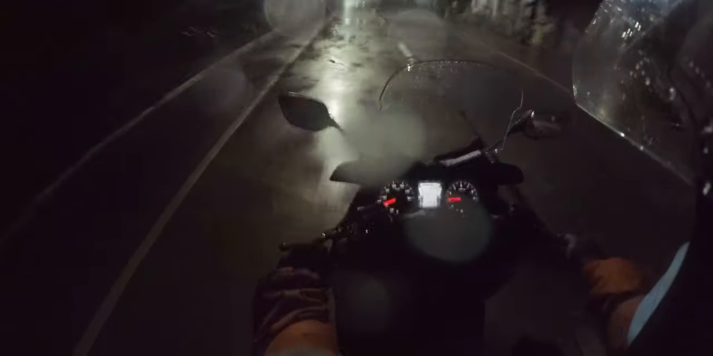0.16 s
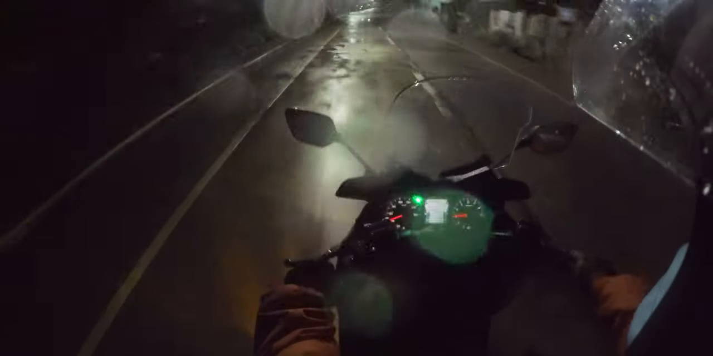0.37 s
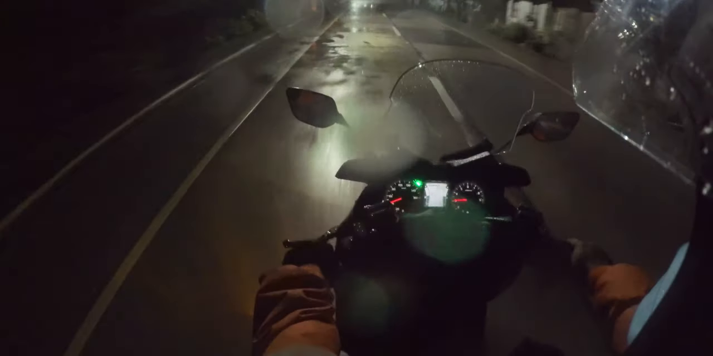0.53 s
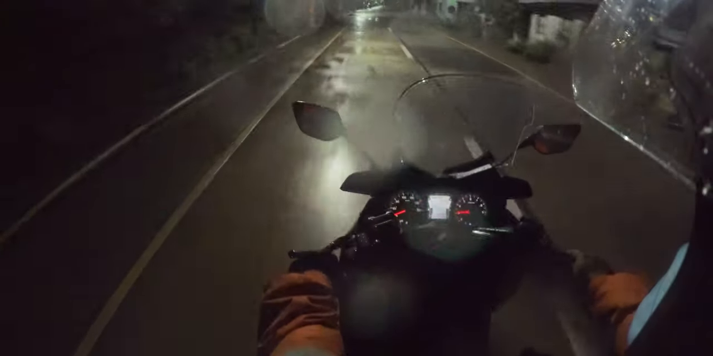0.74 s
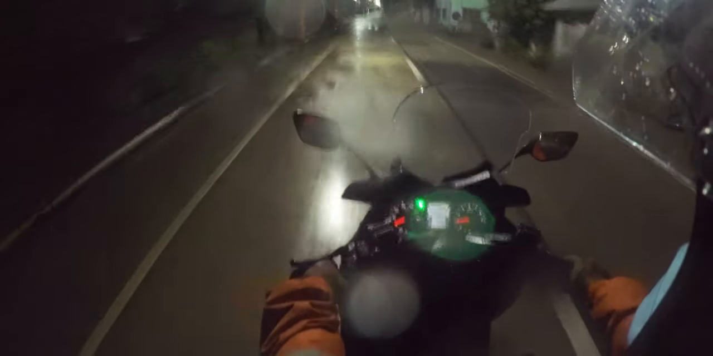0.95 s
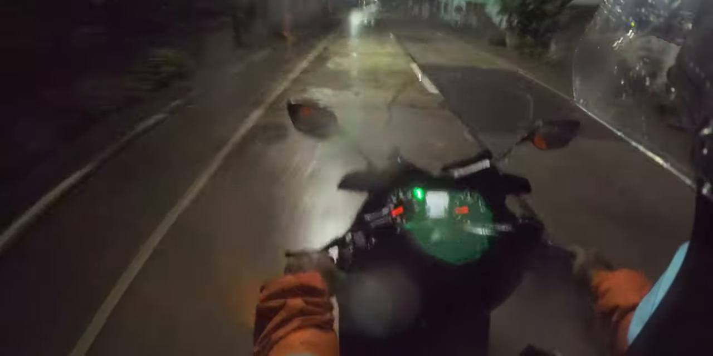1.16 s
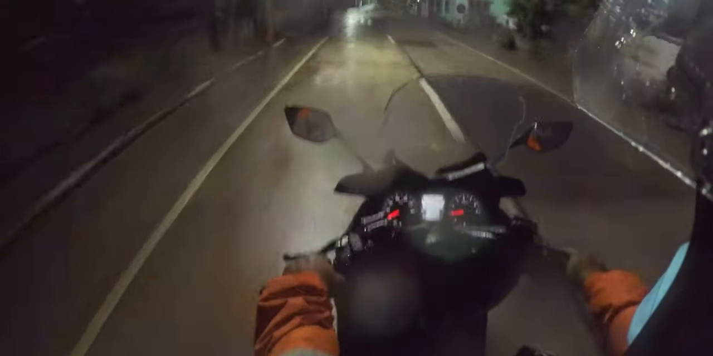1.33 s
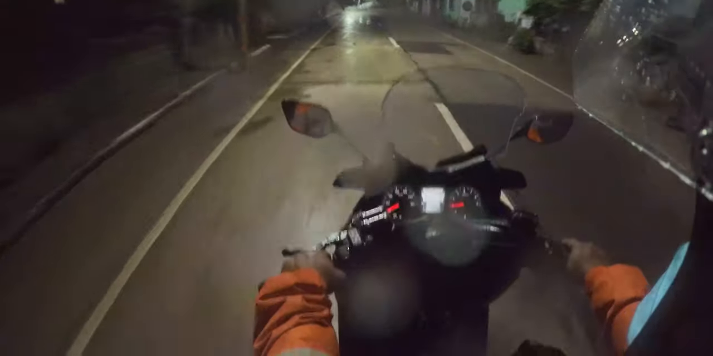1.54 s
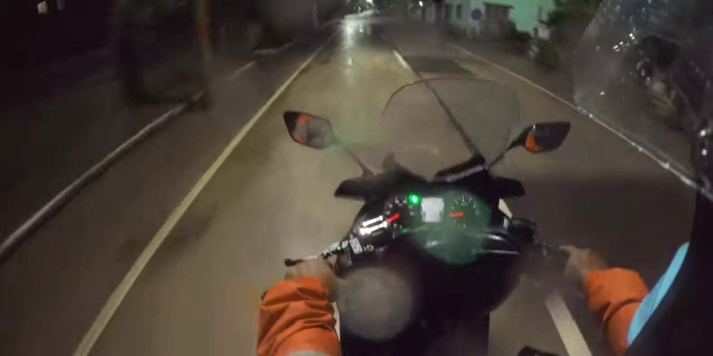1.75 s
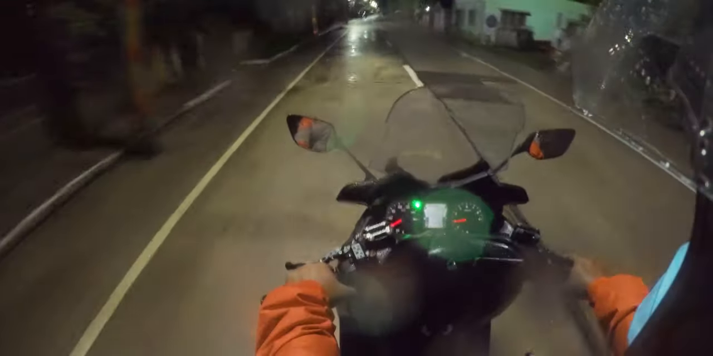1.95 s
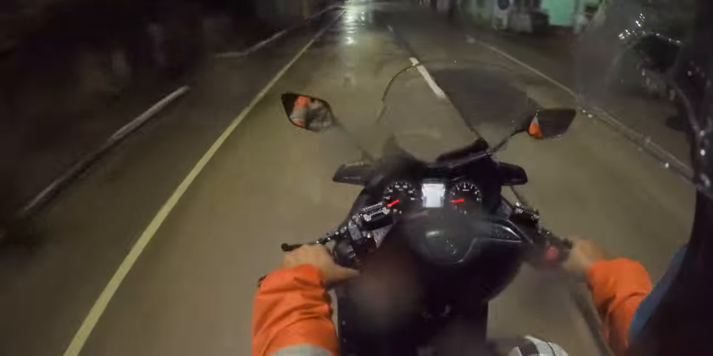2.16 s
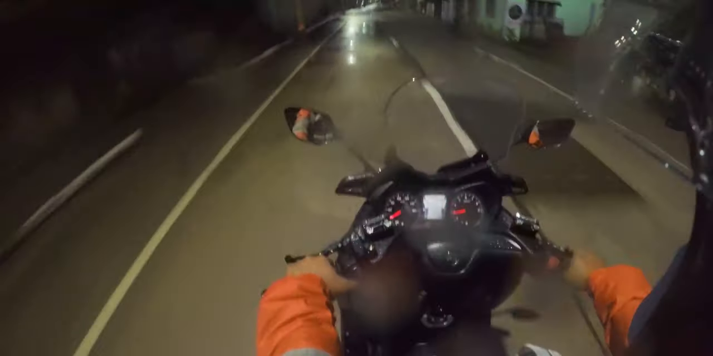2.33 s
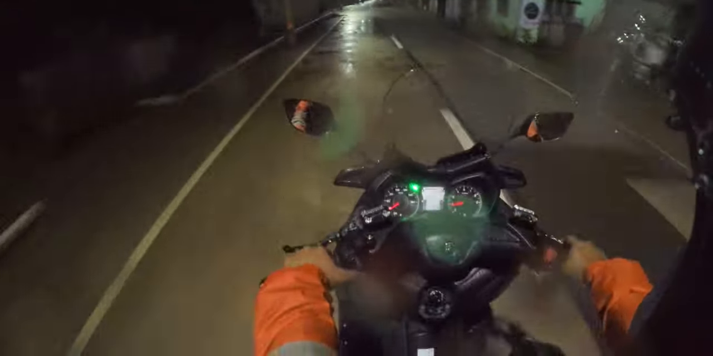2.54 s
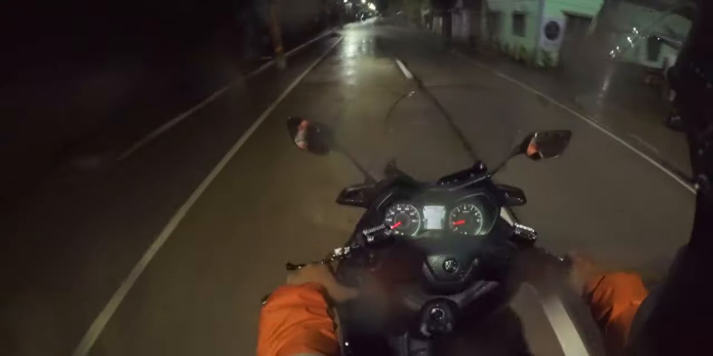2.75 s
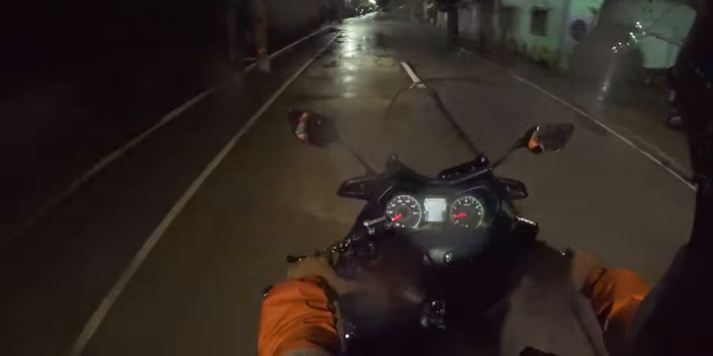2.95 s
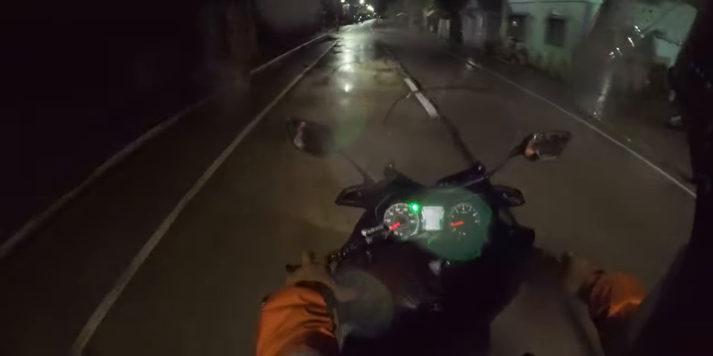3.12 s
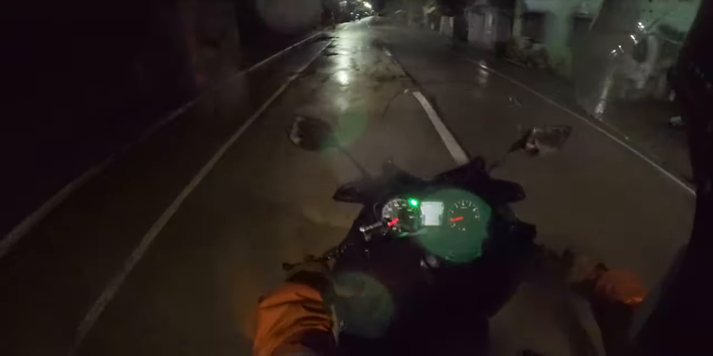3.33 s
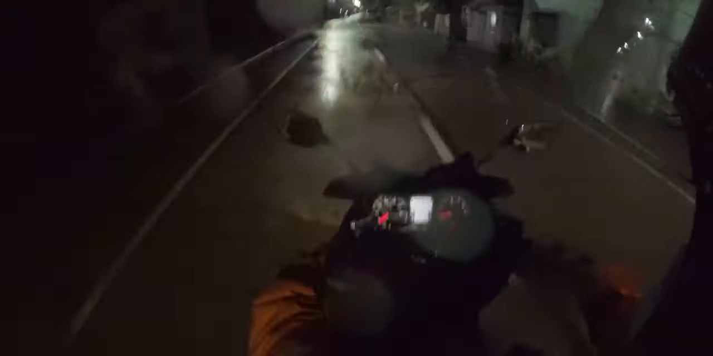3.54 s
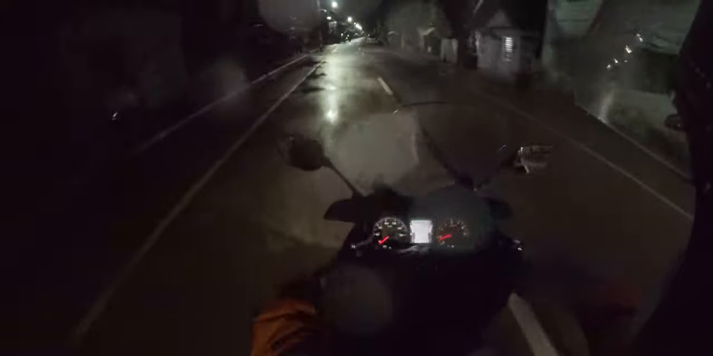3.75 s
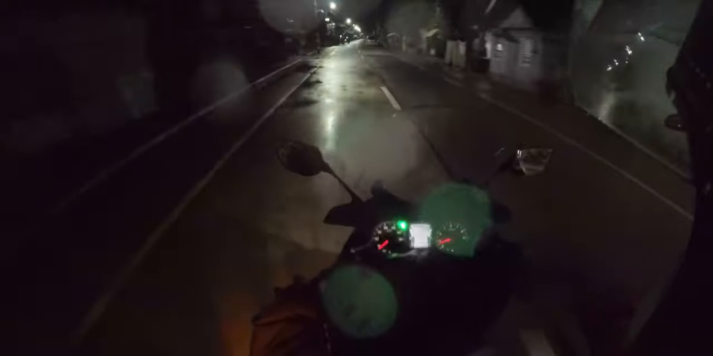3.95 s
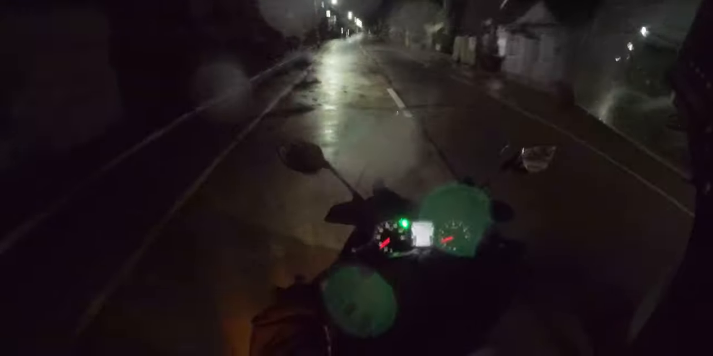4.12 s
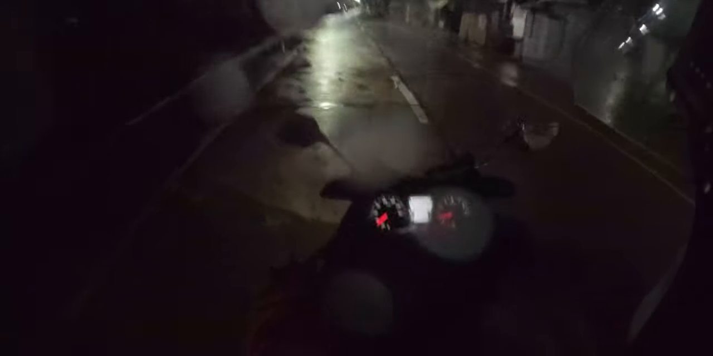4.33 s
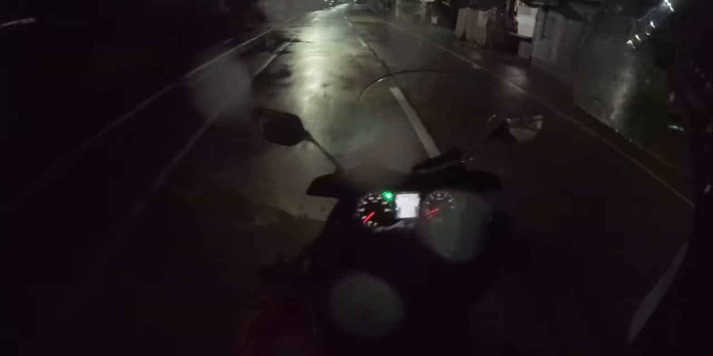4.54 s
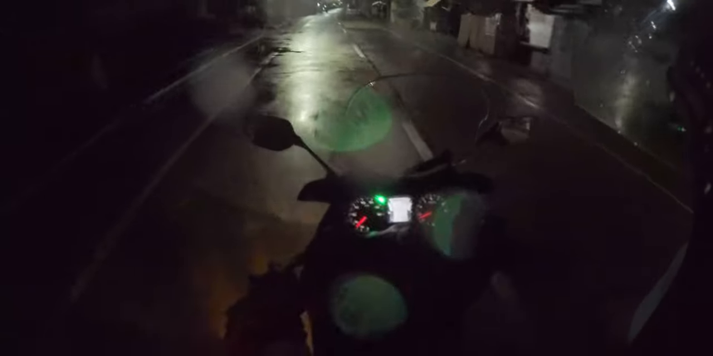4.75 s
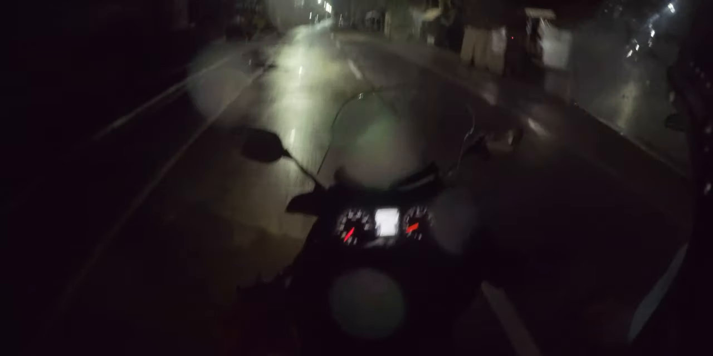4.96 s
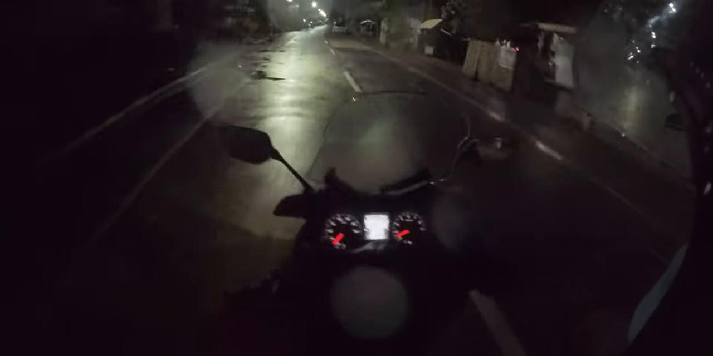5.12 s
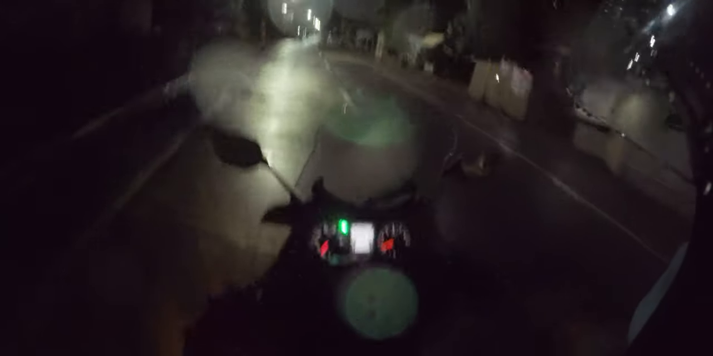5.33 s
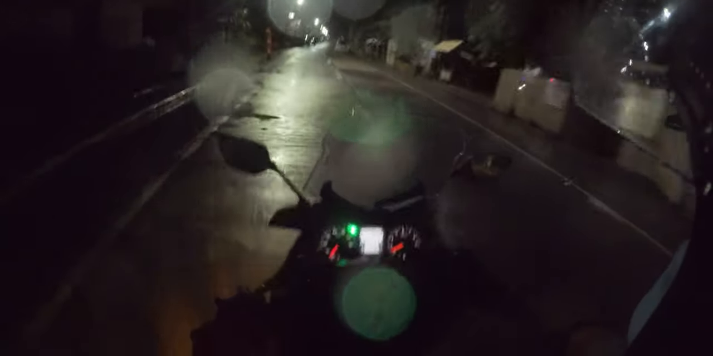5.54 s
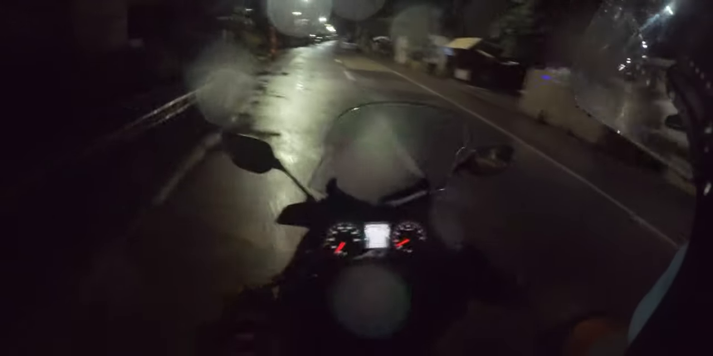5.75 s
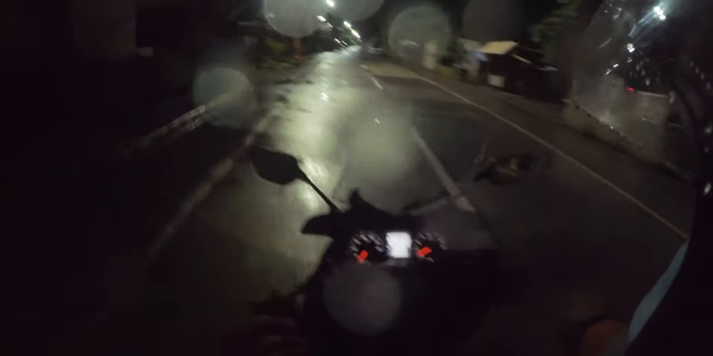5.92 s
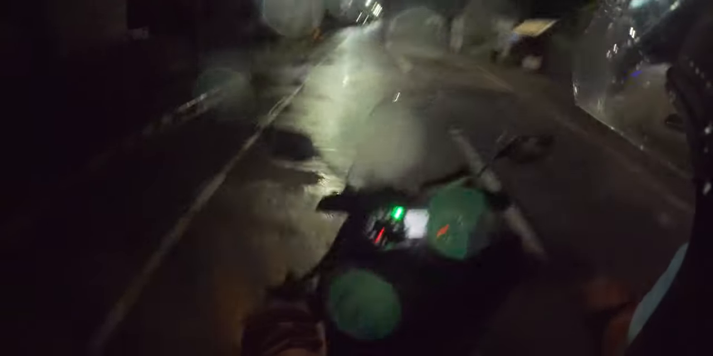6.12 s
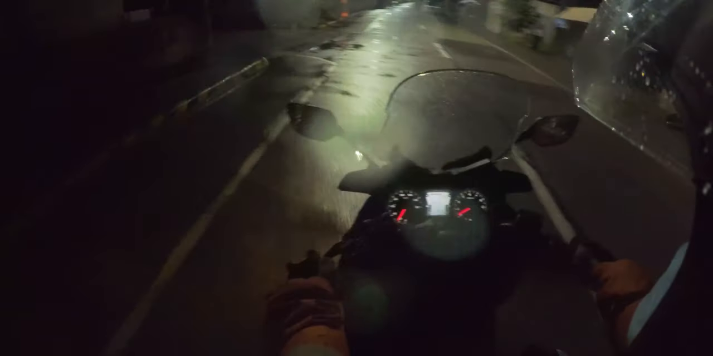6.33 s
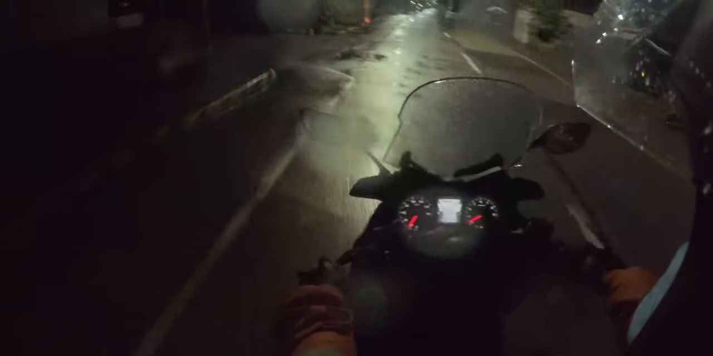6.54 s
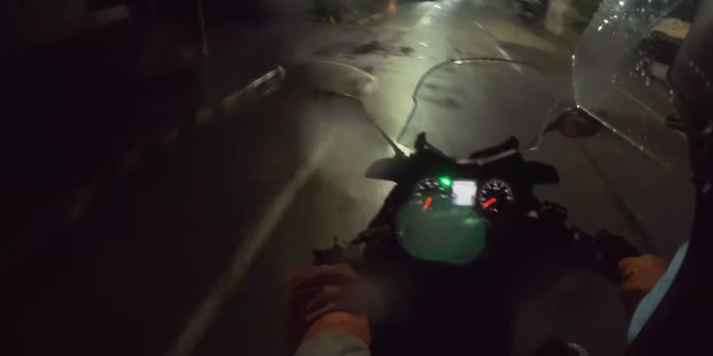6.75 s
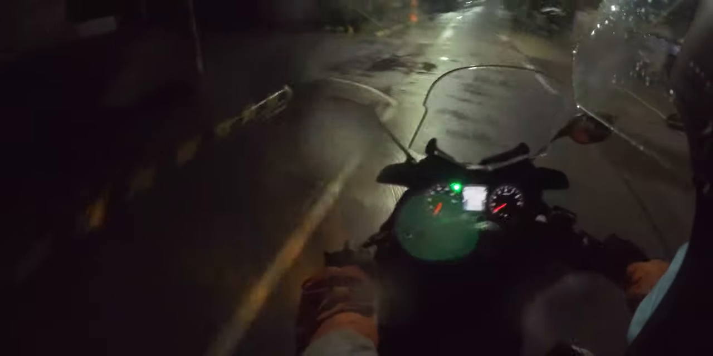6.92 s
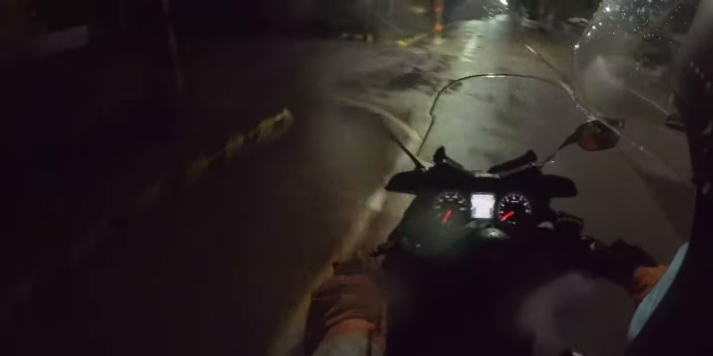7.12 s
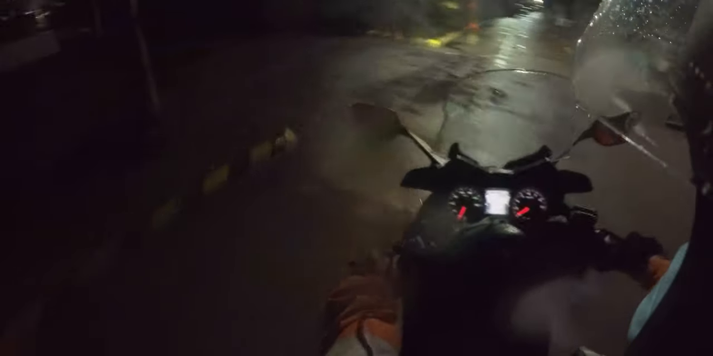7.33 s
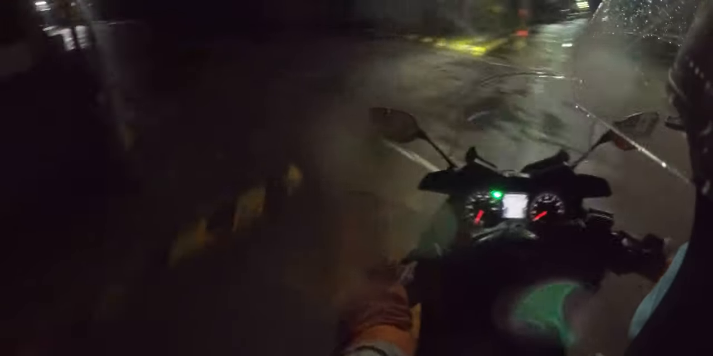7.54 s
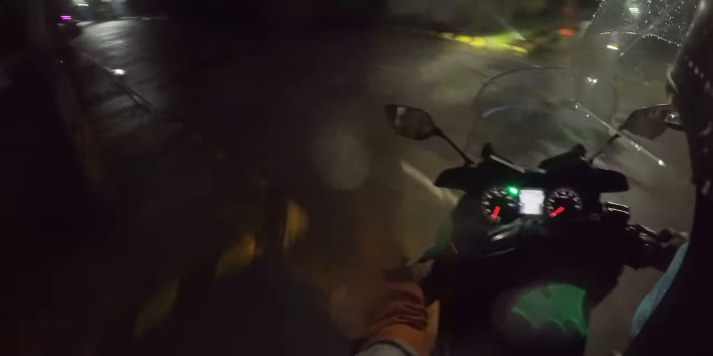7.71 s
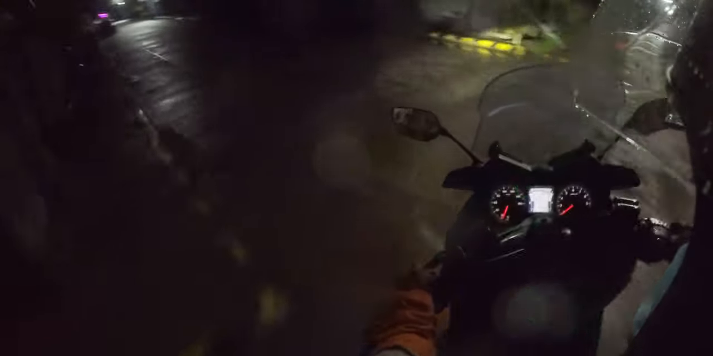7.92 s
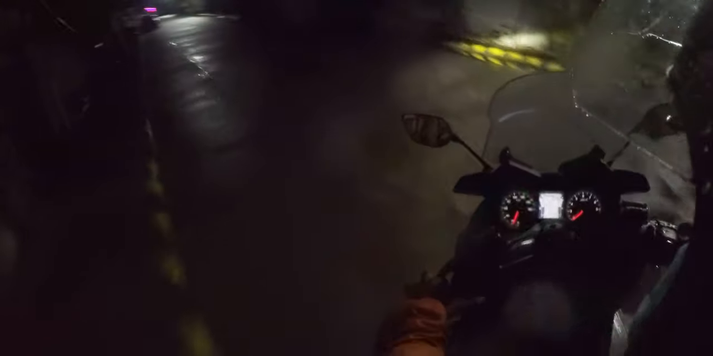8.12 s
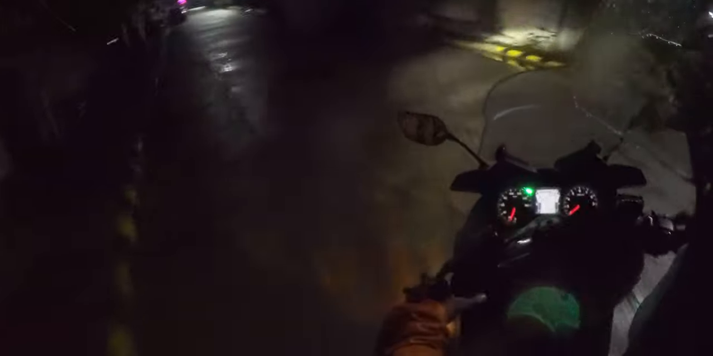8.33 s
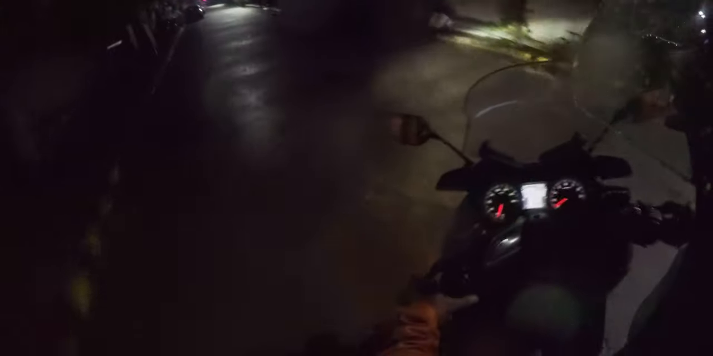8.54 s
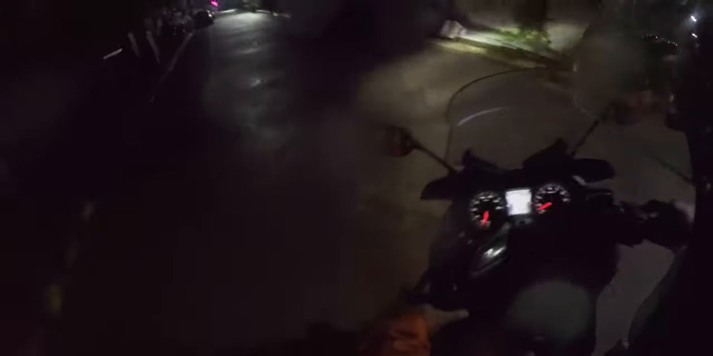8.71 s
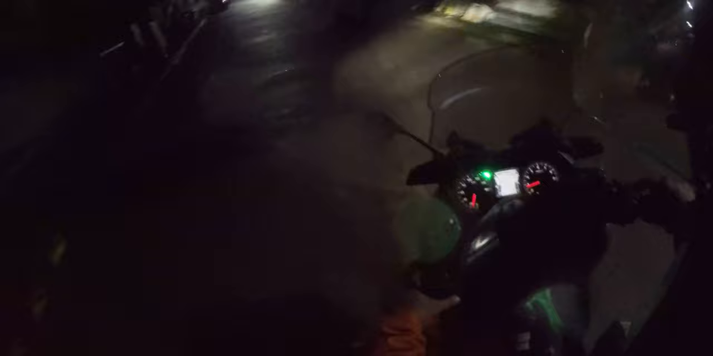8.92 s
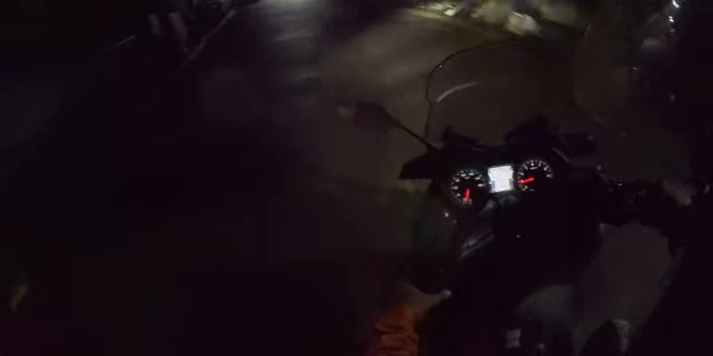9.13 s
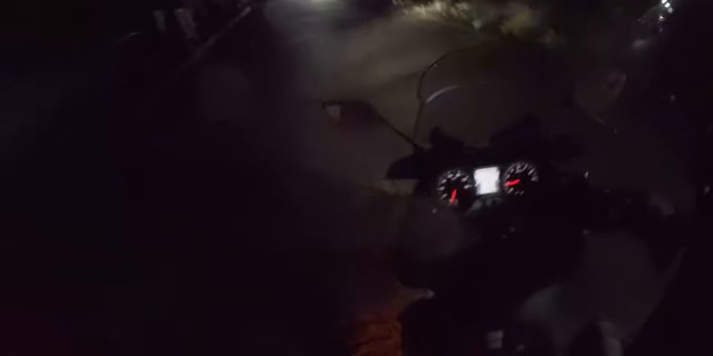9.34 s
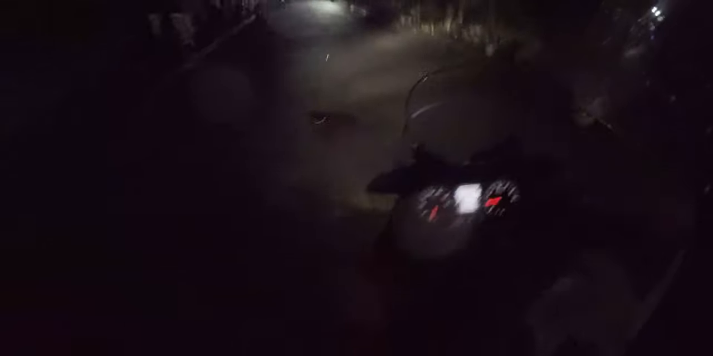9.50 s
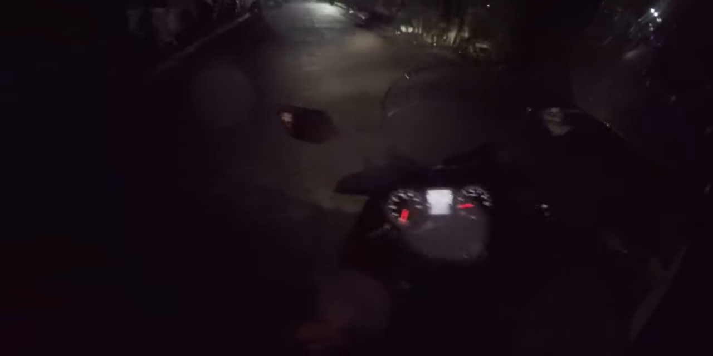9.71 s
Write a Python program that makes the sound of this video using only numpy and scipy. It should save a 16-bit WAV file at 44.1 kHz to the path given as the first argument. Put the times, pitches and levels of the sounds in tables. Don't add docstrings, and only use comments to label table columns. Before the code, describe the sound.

Close, muffled sound from a helmet camera in a plastic housing on a wet night street. Deep wind buffeting, rough roar, frame rumble and tyre spray start strong, with crackling snaps of wet air at the microphone. Raindrops knock and tick, one smacking loudly around three seconds. Everything sinks as the scooter slows, then a small engine putters and buzzes near the end.

```python
import sys
import numpy as np
from scipy import signal
from scipy.fft import rfft, irfft, next_fast_len
from scipy.io import wavfile
from scipy.ndimage import uniform_filter1d

SR = 44100
rng = np.random.default_rng(int(sys.argv[2]) if len(sys.argv) > 2 else 0)


def rack_gain(trim_db):
    fader = np.asarray(trim_db, float)
    return 10 ** (fader / 20)


def waveform_to_disk(signal):
    frames = np.transpose(np.atleast_2d(signal))
    scaled = np.clip(frames, -1, 1) * 32767
    samples = np.round(scaled).astype(np.int16)
    wavfile.write(sys.argv[1], SR, samples)


N = 435266
T = np.arange(N) / SR

# time_s, level_db (below full speed)
AIR = [(0, -2), (.7, -1.5), (1.4, -3), (2.1, -4), (2.8, -3), (3.4, -7), (4.0, -7), (4.6, -12), (5.2, -12),
       (5.8, -16.5), (6.3, -15), (6.9, -20), (7.5, -19), (8.1, -23.5), (8.7, -20), (9.2, -18.5),
       (9.6, -12.5), (9.87, -16.5)]
# time_s, level_db (below full speed)
ROAD = [(0, -4), (0.598, 1.5), (1.5, -2), (2.4, -1.5), (3.0, -3), (3.6, -8.5), (4.6, -10.5), (5.3, -12.5),
        (6.2, -18), (7.0, -18), (8.1, -22.5), (9.0, -17), (9.87, -16.5)]
# centre_s, half_length_s, level_db
SHELTER = [
    (.12, 0.024, -1.5),
    (.265, .02, -0.5),
    (.77, 0.073, -5.5),
    (2.04, 0.073, -5),
    (4.67, 0.18, -3),
    (5.6, 0.13, -1),
]
# time_s, share (0 to 1)
SHEDDING = [(0, 0.0), (1.0, 0.0), (1.5, .3), (2.4, .1), (3.3, .5), (5.0, .8), (6.0, 1.0), (9.87, 1.0)]
# pitch_hz, width_hz, lift_db
FRAME = [(82.4, 18.4, 9.5), (131.3, 4.3, -5.5), (209, 5.2, 9.5), (427, 30, 4.5)]


def evened(x):
    return x / np.sqrt(np.mean(x ** 2) + 1e-20)


def noise():
    return rng.standard_normal(N)


def column(rows, index, outside=None):
    table = np.transpose(rows)
    return np.interp(T, table[0], table[index], outside, outside)


def follow(full_speed_db, db_per_db, control=AIR):
    return full_speed_db + db_per_db * column(control, index=1)


def dips(rows):
    coarse_t = T[::64]
    bells = sum(db * np.exp(-((coarse_t - s) / half) ** 2) for s, half, db in rows)
    return bells.repeat(64)[:N]


def wander(per_s):
    steps = rng.standard_normal(800)
    path = np.interp(T * per_s, np.arange(len(steps)), steps)
    return evened(uniform_filter1d(path, int(SR / per_s)))


def add(mix, s, sound):
    part = mix[round(s * SR):][:len(sound)]
    part += sound[:len(part)]


def resonate(x, hz, width):
    r = np.exp(-np.pi * width / SR)
    if np.isscalar(hz):
        return 2 * signal.lfilter([1 - r], [1, -r * np.exp(2j * np.pi * hz / SR)], x).real
    turn = np.exp(2j * np.pi * np.cumsum(hz) / SR)
    return 2 * (turn * signal.lfilter([1 - r], [1, -r], x / turn)).real


def colour(x, points, lifts):
    size = next_fast_len(N)
    hz = np.arange(size // 2 + 1) * SR / size + 1
    f, db = np.transpose(points)
    shape_db = np.interp(np.log(hz), np.log(f), db, -100, -100)
    shape_db += sum(lift / (1 + (2 * (hz - c) / w) ** 2) for c, w, lift in lifts)
    return evened(irfft(rfft(x, size) * rack_gain(shape_db), size)[:N])


def ring(modes, stretch, slow, rise_s, chance):
    t = T[:5000]
    out = np.zeros(len(t))
    for (hz, db, t60), (phase, detune) in zip(modes, chance):
        pitch_hz = hz * stretch * (1 + 0.051 * (detune - 0.5))
        out += rack_gain(db - 60 * t / (t60 * slow)) * np.sin(2 * np.pi * pitch_hz * t + phase)
    out = out * (1 - np.exp(-t / rise_s))
    return out / abs(out).max()


def splash(wet):
    band = signal.butter(4, [1100, 4500], "bandpass", fs=SR, output="sos")
    return evened(signal.sosfilt(band, wet))


def buffet(steadiness=0.75, mass_hz=62):
    # pitch_hz, level_db (per Hz)
    fast_spectrum = [(10, -34), (18, -20), (25, -9), (31, 0), (37, -5), (46, -9), (55, -17), (64, -25)]
    # pitch_hz, level_db (per Hz)
    slow_spectrum = [(10, -55), (18, -17), (26, -7.5), (31, 1.5), (40, -4.5), (48, -4), (55, -7.5),
                     (64, -13)]
    # centre_s, half_length_s, level_db
    lulls = [(.45, 0.026, 4.5), (.51, 0.015, -10), (1.15, .03, 3.5), (1.28, 0.07, -0.5),
             (1.54, 0.025, -4.5), (1.6, 0.019, 8.5), (1.71, 0.076, -7.5), (1.86, 0.1, 5),
             (1.95, 0.027, 1.5), (2.14, 0.069, -5), (2.48, 0.039, 7), (2.6, 0.1, -11), (2.8, 0.024, 5.5),
             (2.92, 0.043, -6), (3.0, 0.037, 5), (3.1, .025, 0), (3.25, 0.063, -5), (3.5, 0.013, -6),
             (3.55, 0.02, 10), (3.7, 0.11, -7.5), (3.8, 0.034, 8.5), (3.92, 0.033, 4.5),
             (4.07, 0.089, -5.5), (4.2, 0.026, 3), (4.5, 0.022, 4), (4.57, 0.033, -2.5), (4.67, 0.067, 4),
             (4.81, 0.05, -8.5), (5.1, 0.043, -3.5), (5.2, 0.036, 1.5), (5.3, 0.021, -6), (5.39, 0.031, 5),
             (5.5, 0.089, -4.5), (5.6, 0.028, 5), (5.8, 0.02, 5), (6.07, .04, -6), (6.18, 0.066, 3.5),
             (6.32, 0.037, -9), (6.44, 0.022, -14), (6.85, .04, -7), (7.15, 0.014, 10), (7.3, 0.029, -8),
             (7.43, 0.036, -7), (7.68, 0.046, -4), (7.8, 0.043, 4.5), (8.06, .03, -4), (8.79, 0.046, -5),
             (9.02, 0.019, -9), (9.43, 0.024, -11)]
    air, share = noise(), column(SHEDDING, index=1)
    fast = colour(air, fast_spectrum, [(32.023, 5.5, 4.6)])
    slow = colour(air, slow_spectrum, [])
    rock = (1 - share) * fast + share * slow
    swing = np.sqrt(uniform_filter1d(uniform_filter1d(rock ** 2, size=1400), size=1400))
    level_db = follow(-13, 1) + dips(lulls)
    rock = rock / swing ** steadiness
    joined = np.roll(rock, -np.argmin(rock[:4000]))
    pushed = rack_gain(level_db) * evened(joined)
    mass = signal.butter(4, mass_hz, fs=SR, output="sos")
    return signal.sosfiltfilt(mass, pushed, padtype="even")


def rumble():
    # pitch_hz, level_db (per Hz)
    rumble_spectrum = [(35, -46), (60, -9.5), (108, -17), (140, -13.5), (173, -25), (204, -24.5),
                       (237, -34.5), (300, -35), (390, -110), (660, -120)]
    # centre_s, half_length_s, level_db
    smooth = [(.1, 0.072, -2), (.42, .07, -3), (.76, 0.027, -14), (1.05, 0.071, -4.5), (1.7, 0.15, -2.5),
              (2.2, 0.062, -5.5), (2.47, 0.065, -3.5), (3.1, .07, -2.5), (4.72, 0.064, -5.5),
              (5.28, 0.16, -4.5), (7.13, 0.075, -6), (7.88, 0.042, -2)]
    level_db = np.minimum(follow(-39, 0.92, ROAD), -42.5)
    level_db += 0.89 * dips(SHELTER) + dips(smooth) + 9.0 + 1.07 * wander(6)
    return colour(noise(), rumble_spectrum, FRAME) * rack_gain(level_db)


def roar():
    # pitch_hz, level_db (per Hz)
    roar_spectrum = [(140, -27), (230, -2.5), (499, -6), (816, -3.5), (1370, -10.5), (1750, -2),
                     (2130, -14), (2400, -5), (3120, -18), (5280, -120)]
    # centre_s, half_length_s, level_db
    swells = [(.05, 0.056, 3), (.19, 0.025, 4.5), (.27, 0.041, -2.5), (.41, .04, -0.5), (.47, 0.021, 6.5),
              (.55, .03, -4.5), (.64, 0.058, 4.5), (.9, 0.056, -3), (1.4, 0.18, 3), (1.75, 0.065, 1.5),
              (2.22, 0.084, 3), (2.6, 0.062, 2), (2.85, 0.12, 5), (3.2, 0.055, -3), (4.95, .05, 2),
              (5.3, 0.065, 2.5), (6.75, 0.094, -4), (9.75, 0.15, 4)]
    flicker_db = (2.0 - 0.5 * column(SHEDDING, index=1)) * wander(21.927)
    level_db = follow(-46, 0.61) + dips(SHELTER) + dips(swells) + 2.5 + flicker_db
    return colour(noise(), roar_spectrum, FRAME) * rack_gain(level_db)


def tyre_spray():
    # pitch_hz, level_db (per Hz)
    spray_spectrum = [(290, -32), (500, -20), (529, -2), (790, -11), (899, -23), (1130, -20.5),
                      (1270, -11.5), (1920, 0.5), (2450, -2.5), (2910, -7.5), (3450, -4), (5380, -16.5),
                      (15300, -33.5)]
    # pitch_hz, width_hz, lift_db
    walls = [(1161, 247, 18.5), (1674, 120, -13), (2276, 228, -42), (2395, 146, 21.5), (2780, 140, -0.5),
             (3440, 260, 4), (4630, 610, 6), (5400, 1200, -2.5), (6660, 2550, 7.5), (10430, 1050, 5.5)]
    # centre_s, half_length_s, level_db
    puddles = [
        (.12, 0.026, -10),
        (.265, .02, -5),
        (.65, 0.036, 1.5),
        (4.45, .06, 1),
        (4.72, .05, 2.5),
        (5.3, .08, -1),
        (7.63, 0.033, 5.5),
        (7.07, 0.085, -1),
    ]
    droplets = noise() * rack_gain(1.13 * wander(70))
    level_db = follow(-54.5, 0.61, ROAD) + 0.13 * dips(SHELTER) + dips(puddles)
    level_db += 9.5 + 0.5 * wander(13)
    return colour(droplets, spray_spectrum, walls) * rack_gain(level_db)


def port(edge=2.5):
    # pitch_hz, level_db (per Hz)
    port_spectrum = [(600, -35), (1000, -16), (2050, -13.5), (2700, -6.5), (3560, 4), (4400, -0.5),
                     (4900, -12.5), (5250, -23), (6400, -21), (8500, -47), (10800, -39), (13000, -60)]
    # pitch_hz, width_hz, lift_db
    port_modes = [(3610, 610, 2.5), (2500, 730, 2), (4910, 1500, -5.5), (4205, 230, -9)]
    # start_s, length_s, level_db
    gusts = [(.0, 0.064, -36.5), (0.168, 0.073, -34.5), (0.309, 0.055, -33), (0.452, 0.019, -28),
             (0.604, 0.091, -32), (0.937, 0.039, -30.5), (1.162, 0.045, -28), (1.254, 0.094, -37),
             (1.398, 0.078, -38.5), (1.521, 0.064, -36.5), (1.734, 0.072, -34.5), (2.132, 0.017, -33.5),
             (2.204, 0.048, -36), (2.28, 0.068, -36), (2.498, 0.087, -29), (2.77, 0.09, -32.5),
             (2.881, 0.11, -38.5), (2.537, 0.047, -25.5), (3.255, 0.012, -36), (3.29, 0.054, -36.5),
             (3.605, 0.127, -35.5), (3.741, 0.12, -32), (3.87, 0.071, -39), (4.01, .11, -39.5),
             (4.113, 0.054, -33.5), (4.166, 0.14, -40.5), (4.652, .1, -51), (4.889, 0.028, -44),
             (5.238, 0.13, -40), (9.677, 0.16, -47.5)]
    # time_s, peak_db
    spits = [(.25, -53), (0.334, -26.5), (.499, -34), (.54, -38), (2.258, -28), (1.034, -31), (1.071, -34),
             (1.203, -36), (1.326, -25.5), (1.455, -27), (1.62, -29), (1.747, -29), (1.919, -35.5),
             (2.105, -47), (7.625, -54), (2.693, -30), (3.406, -40), (3.453, -41), (3.484, -36),
             (3.515, -40), (3.981, -34.5), (4.334, -32), (5.052, -37), (5.119, -40.5), (9.798, -38.5)]
    # time_s, peak_db
    snaps = [(0.163, -20), (0.3244, -11.5), (0.572, -13.5), (0.6539, -27), (0.6734, -27), (0.886, -16.5),
             (0.9398, -27), (1.1887, -26), (1.5229, -17.5), (1.6601, -19.5), (1.8252, -14), (2.1021, -30),
             (2.2214, -21), (2.296, -14), (2.5007, -19), (2.5401, -20), (2.6853, -28), (2.797, -14),
             (2.824, -32), (3.4772, -15.5), (3.7953, -22)]
    gust_edge_s = 0.0059
    spit_rise_s, spit_fall_s = 0.013, 0.0067
    snap_rise_s, snap_fall_s, snap_db = 0.0009, 0.012, -12
    power = rack_gain(follow(-46, 0.83) + dips(SHELTER) + 0.83 * wander(30)) ** 2

    lead_s = T[2000]
    t = T[:16000] - lead_s
    spit_away = abs(t) / np.where(t < 0, spit_rise_s, spit_fall_s)
    snap_away = abs(t) / np.where(t < 0, snap_rise_s, snap_fall_s)
    bursts = [(s, db, np.maximum(-t, t - length).clip(0) / gust_edge_s) for s, length, db in gusts]
    bursts += [(s, db, spit_away) for s, db in spits]
    bursts += [(s + snap_rise_s, db + snap_db, snap_away) for s, db in snaps]
    for s, db, away in bursts:
        burst = rack_gain(2 * db - 7.5 - 14.3 * away ** edge)
        too_early = max(round((lead_s - s) * SR), 0)
        add(power, max(s - lead_s, 0), burst[too_early:])

    grains = rack_gain(1.8 * np.minimum(rng.exponential(1, N), 3.5))
    grains = grains * (rng.random(N) < 330 / SR)
    sputter = 0.92 + evened(signal.oaconvolve(grains, np.exp(-T[:400] / 0.0016))[:N])
    return np.sqrt(power) * colour(sputter * noise(), port_spectrum, port_modes)


def injector_ticks(chatter):
    # time_s, level_db
    injector_levels = [(0, -82), (.3, -87), (4, -86), (4.4, -84), (8.4, -87), (8.7, -82.5), (9.87, -83)]
    ticks = resonate(chatter, 13380 - 200 * (T > 8.55), 260)
    ticks = evened(resonate(resonate(ticks, 13300, 500), 13300, 500))
    return rack_gain(column(injector_levels, index=1)) * ticks


def mount():
    # centre_s, half_length_s, pitch_hz, level_db
    shakes = [(.27, 0.055, 205, -47), (.68, 0.061, 215, -45.5), (0.94, 0.049, 83, -35.5),
              (0.964, 0.043, 210, -45.5), (1.1, 0.042, 220, -47.5), (1.32, 0.03, 216, -45),
              (1.9, 0.043, 128, -40), (1.75, 0.18, 210, -51), (2.19, 0.059, 196, -44),
              (2.84, 0.069, 210, -43), (3.1, 0.064, 123, -35), (2.65, 0.056, 435, -53),
              (2.85, 0.059, 440, -52), (3.32, 0.04, 428, -51.5), (3.25, 0.06, 200, -48),
              (3.8, .05, 71, -32.5), (3.2, .04, 82, -37), (2.78, .05, 71, -33), (1.6, 0.028, 62, -33),
              (5.35, 0.089, 66.4, -36), (0.86, 0.09, 720, -58), (0.54, 0.073, 750, -58),
              (7.35, 0.1, 1250, -61), (6.3, .2, 1100, -62), (6.9, .2, 1270, -64.5), (4.1, .05, 120, -47),
              (5.06, 0.042, 203, -51), (6.15, 0.068, 170, -49.5), (6.9, .03, 136, -53),
              (7.64, 0.068, 137, -48.5), (8.76, 0.041, 140, -52), (8.6, 0.036, 142, -50),
              (9.47, 0.059, 136, -43.5), (9.63, 0.078, 138, -48), (9.72, 0.079, 1170, -53.5),
              (9.866, .01, 200, -45), (9.866, 0.0083, 400, -49), (3.43, 0.046, 58, -31),
              (1.58, .03, 85, -34), (2.4, .04, 77, -33), (7.5, .02, 1760, -58), (7.75, .025, 1750, -56),
              (9.13, .02, 1800, -56), (9.36, .02, 1830, -57)]
    out, t = np.zeros(N + SR), T[:16000] - T[8000]
    for (s, half, hz, db), push in zip(shakes, rng.standard_normal((len(shakes), 16000))):
        rough = evened(resonate(push, hz, 10))
        pure = np.sqrt(2) * np.sin(2 * np.pi * hz * t + push[0])
        add(out, s, rack_gain(db) * (0.34 * rough + pure) * np.exp(-(t / half) ** 2))
    return out[8000:N + 8000]


def drops_on_helmet():
    # time_s, peak_db, ring_hz, sharpness_db (per octave off 1750 Hz), ring_length (factor)
    drops = [(1.008, -23.5, 1800, 6, 0.67), (1.385, -27.5, 1710, 11, 0.42), (1.6175, -33, 1800, 4, 0.33),
             (1.756, -22, 1740, 2, 0.78), (1.95, -37, 1710, -16.5, 0.51), (2.019, -28.5, 1970, 20, 0.2),
             (2.103, -30, 1760, 0, 0.15), (2.131, -35, 1710, 0, 1.0), (3.0041, -58, 1740, 9, 0.81),
             (3.586, -41, 1860, 0, 1.0), (3.881, -37, 1765, -5, 1.0), (5.217, -26, 1800, -4, 0.9),
             (5.7294, -40, 1800, 11, 1.0), (5.7889, -17, 1747, -7, 0.58), (6.139, -28, 1800, 8, 0.19),
             (6.383, -35.5, 1800, 17, 0.23), (6.5967, -30.5, 1800, -10, 0.72), (7.0997, -40, 1770, 0, 0.34),
             (7.1757, -36.5, 1750, 14, 0.47), (7.314, -30, 1816, 11, 0.54), (7.815, -25, 1726, 5, 0.61),
             (8.043, -31, 1755, 8, 1.0), (8.777, -34, 1710, 3, 0.89), (9.037, -27, 1740, 1, 0.2)]
    # pitch_hz, level_db, t60_s (time to fade by 60 dB)
    shell = [(1160, -5.5, 0.046), (1410, -4.5, 0.088), (1400, -3, 0.0056), (1710, 2, 0.093),
             (1800, 2, 0.14), (1903, 3, 0.051), (2440, -7.5, 0.069), (2910, -10, 0.05), (2150, -12, .015),
             (2660, -2, 0.019), (4150, -10, 0.021)]
    out, t = np.zeros(N), T[:1600]
    chances = rng.random((len(drops), 11, 2))
    wets = rng.standard_normal((len(drops), 1600))
    for (s, db, hz, sharp_db, slow), chance, wet in zip(drops, chances, wets):
        slow = max(slow, 0.1)
        struck = [(f, d + sharp_db * abs(np.log2(f / 1750)), t60) for f, d, t60 in shell]
        add(out, s - 0.001, rack_gain(db) * ring(struck, hz / 1770, slow, 0.0011, chance))

        slap_fade = np.exp(-t / 0.0038) + 0.23 * np.exp(-t / 0.016)
        add(out, s - 0.001, rack_gain(db + 0.6 * sharp_db - 22.5) * splash(wet) * slap_fade)

        spread = evened(resonate(resonate(wet, hz, 500), hz, 700))
        spread_fade = (1 - np.exp(-t / 0.002)) * np.exp(-t / (0.025 * slow))
        add(out, s, rack_gain(db - 16.5) * spread * spread_fade)
    return out


def ticks_on_housing():
    # time_s, peak_db, low_db, middle_db, high_db (levels of the three rings)
    ticks = [(1.155, -37, -10, -4, 6), (1.2676, -41, -4, -4, -1), (2.3739, -15, -1, -3, -7.5),
             (2.4492, -38, 20, -10, 8.5), (2.609, -43.5, 10, -2, -3), (2.678, -37, -4, -5, -6),
             (3.135, -28, 9.5, -1, -4), (3.2875, -20.5, -2, -1, -6), (3.817, -40.5, -2, -4, 1),
             (4.0013, -41, 3, -2, 5), (7.896, -55, 0, -2, 6), (8.2104, -58, 2, -4, 3),
             (7.62, -58, -4, -4, 3), (7.82, -59, -6, -2, 5)]
    # pitch_hz, level_db, t60_s
    case_low = [(804, -10, 0.018), (1576, 0, 0.016), (1880, 1, 0.0073), (2440, -1.5, 0.021),
                (2950, 2.5, 0.0092), (3840, -3, 0.017), (4580, 2.5, 0.0041)]
    # pitch_hz, level_db, t60_s
    case_mid = [(5540, 2, 0.011), (6500, 6.7, 0.0033), (7260, 3.5, 0.0067)]
    # pitch_hz, level_db, t60_s
    case_high = [(9900, -9, 0.0038), (9930, 9, 0.0028), (11230, 10, 0.0014), (12800, -5, 0.003),
                 (14700, -11, 0.0019)]
    out, t = np.zeros(N), T[:1600]
    chances = rng.random((len(ticks), 7, 2))
    wets = rng.standard_normal((len(ticks), 1600))
    for (s, db, low_db, mid_db, high_db), chance, wet in zip(ticks, chances, wets):
        stretch = 0.892 + 0.2 * chance[0, 0]
        parts = ((case_low, low_db + 3.0), (case_mid, mid_db + 7.0), (case_high, high_db + 3.0))
        for modes, part_db in parts:
            add(out, s + 0.00046, rack_gain(db + part_db) * ring(modes, stretch, 1.0, 0.0001, chance))
        fizz = np.diff(wet, prepend=0) * np.exp(-t / 0.0017)
        add(out, s + 0.00044, rack_gain(db + 0.5 * high_db - 12) * fizz)
    return out


def brake():
    start_s, end_s, pitch_hz, level_db = 1.92, 2.12, 13160, -76
    touch = np.clip(np.minimum(T - start_s, end_s - T) / 0.02, 0, 1)
    squeak = evened(resonate(resonate(noise(), pitch_hz, 60), pitch_hz, 60))
    return rack_gain(level_db) * touch * squeak


def drop_on_door():
    # pitch_hz, level_db, t60_s
    door = [(840, -12, 0.022), (1230, -24, 0.0073), (1710, 1, 0.0093), (2080, -4, .008), (2550, -4, 0.016),
            (3130, 1, .011), (4160, 0, 0.013), (4800, 1, 0.01), (6240, -6, 0.0076), (7600, -1.5, 0.0062),
            (9500, -17, 0.0035), (12500, -14, .004), (13900, -21, 0.0036)]
    hit_s, peak_db = 3.2877, -2.1
    out, t = np.zeros(N), T[:1600]
    chance = rng.random((len(door), 2)) * 0.45 + 0.4
    add(out, hit_s, rack_gain(peak_db) * ring(door, 0.97, 0.88, 0.0002, chance))
    slap = splash(rng.standard_normal(len(t))) * np.exp(-t / 0.0022)
    add(out, hit_s, rack_gain(peak_db - 19) * slap)
    return out


def exhaust(turns, chatter):
    # time_s, level_db
    exhaust_levels = [
        (7.6, -70),
        (8.3, -59),
        (8.6, -53.5),
        (8.9, -50.5),
        (9.2, -49),
        (9.5, -53),
        (9.7, -52),
        (9.87, -48.5),
    ]
    # pitch_hz, width_hz, level_db
    pipe_modes = [(136, 50, 1), (211, 78, -3), (298, 45, -4.5), (491, 41, -4), (593, 43, -14),
                  (820, 120, -14), (1210, 120, -6.5), (1720, 320, -10)]
    pulses = sum(np.cos(2 * np.pi * (k * turns + 0.018 * k * k)) for k in range(3, 72))
    pipe = np.zeros(N)
    for k, (hz, width, db) in enumerate(pipe_modes):
        mode = evened(resonate(resonate(pulses, hz, width), hz, 2 * width))
        pipe += (-1) ** k * rack_gain(db) * mode * rack_gain(0.99 * wander(9.9))
    gas = evened(resonate(resonate(noise(), 1150, 540), 1670, 700))
    puffs = gas * (0.5 + 0.82 * np.exp(-(turns % 1) / 0.5))
    pipe = evened(pipe) + 0.8 * puffs

    valves = evened(resonate(resonate(0.0091 * noise() + chatter, 6300, 900), 6300, 900))
    valves = valves * np.exp(-(turns / 2 % 1) / 0.29)
    return rack_gain(column(exhaust_levels, index=1)) * (evened(pipe) + rack_gain(-16.5) * valves)


def wall_buzz():
    # time_s, pitch_hz, level_db
    buzz_curve = [(7.7, 2440, -58), (8.0, 2410, -81), (8.4, 2420, -64), (8.47, 2400, -62), (8.6, 2420, -64),
                  (8.72, 2410, -69), (8.84, 2400, -51.5), (8.93, 2410, -61), (9.03, 2470, -55),
                  (9.12, 2410, -63), (9.23, 2440, -53), (9.3, 2430, -64), (9.87, 2400, -62)]
    hz = column(buzz_curve, index=1) + 12 * wander(11)
    buzz = evened(resonate(resonate(noise(), hz, 95), hz, 130))
    return rack_gain(column(buzz_curve, index=2, outside=-88) + 1.8 * wander(13)) * buzz


def engine():
    # time_s, firings_per_s
    firing = [(8.0, 22), (8.6, 23.4), (8.9, 24.3), (9.25, 25), (9.42, 25.3), (9.75, 26.4), (9.87, 26.6)]
    turns = np.cumsum(column(firing, index=1) * (1 + 0.00585 * wander(12))) / SR
    opening = turns / 2 % 1 < 0.4
    clicks = (rng.random(N) < (25 + 70 * opening) / SR) * rng.uniform(0.4, 1, N)
    chatter = clicks + 0.008 * noise()
    return exhaust(turns, chatter) + wall_buzz() + injector_ticks(chatter)


def scene():
    steady = buffet() + rumble() + roar() + tyre_spray() + port() + mount() + brake() + engine()
    steady += rack_gain(-71) * noise()
    rain = drops_on_helmet() + ticks_on_housing() + drop_on_door()
    edge = signal.butter(16, 15150, fs=SR, output="sos")
    return (signal.sosfiltfilt(edge, steady, padtype="even") + rain)[None]


def top_cut(x):
    return signal.sosfilt(signal.butter(12, 15500, fs=SR, output="sos"), x)


def record(dry):
    limit = signal.butter(8, 15900, fs=SR, output="sos")
    limited = signal.sosfiltfilt(limit, dry, padtype="even")
    return top_cut(limited)


dry = scene()
out = record(dry)
waveform_to_disk(out)
```